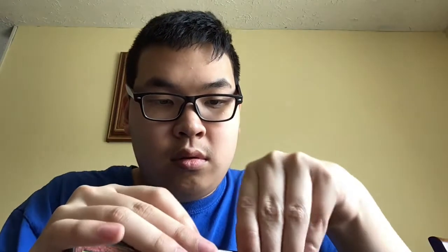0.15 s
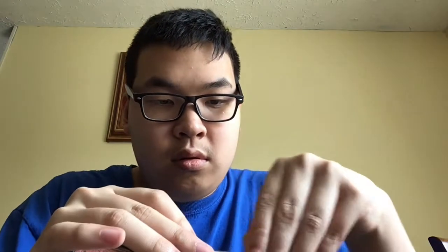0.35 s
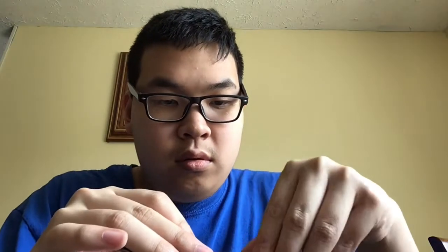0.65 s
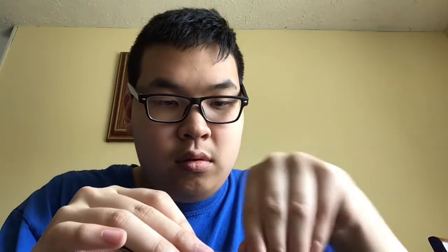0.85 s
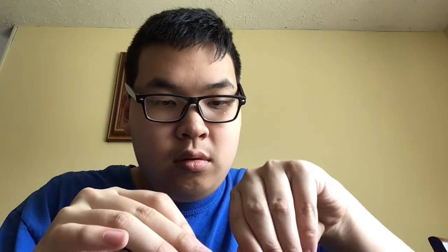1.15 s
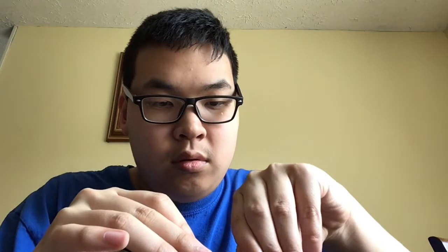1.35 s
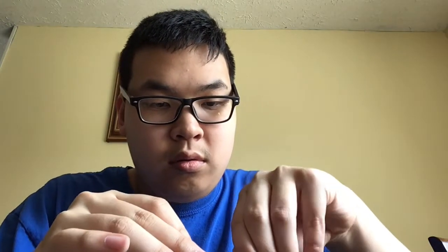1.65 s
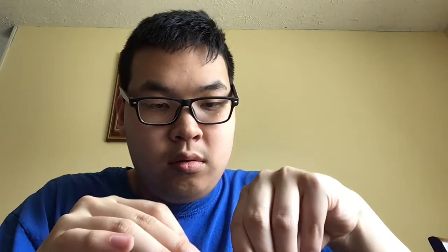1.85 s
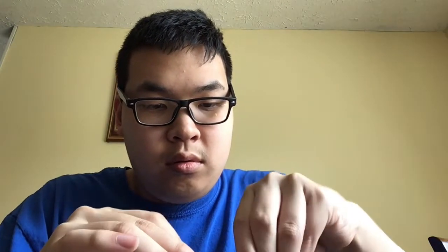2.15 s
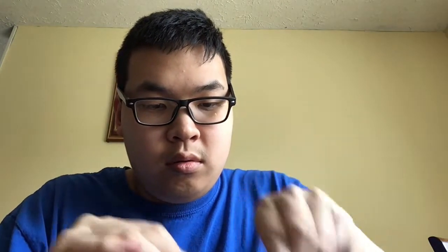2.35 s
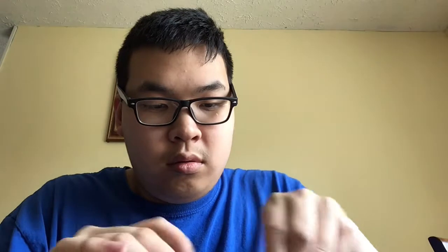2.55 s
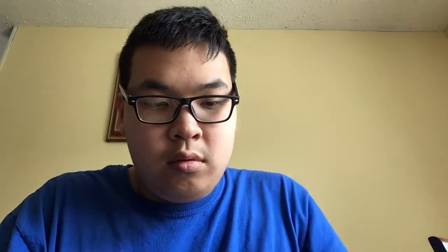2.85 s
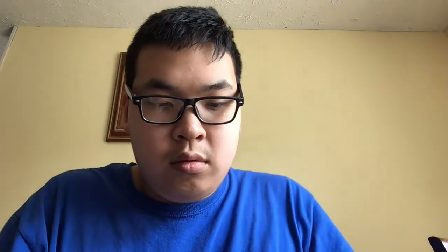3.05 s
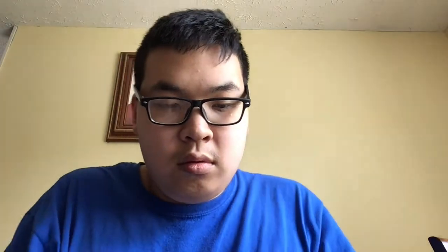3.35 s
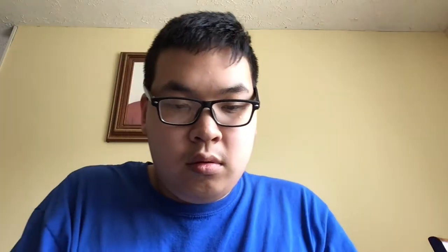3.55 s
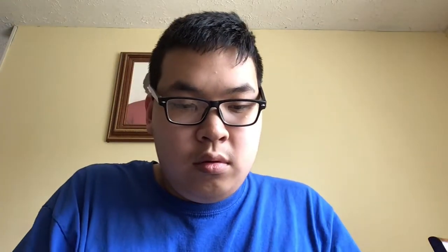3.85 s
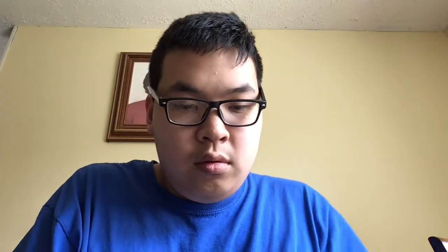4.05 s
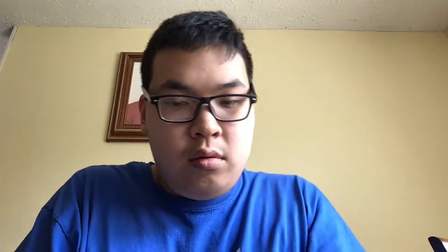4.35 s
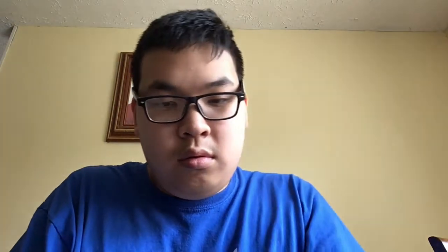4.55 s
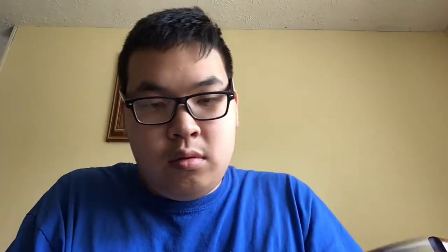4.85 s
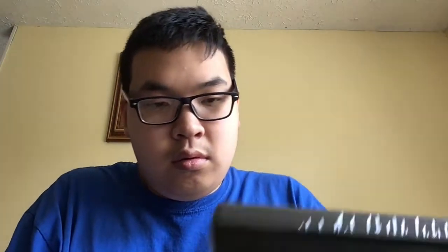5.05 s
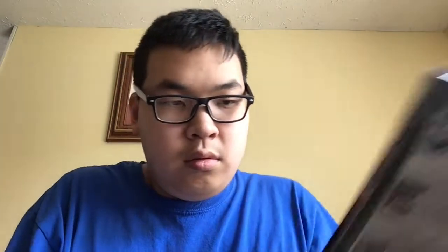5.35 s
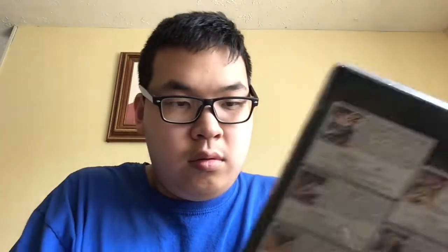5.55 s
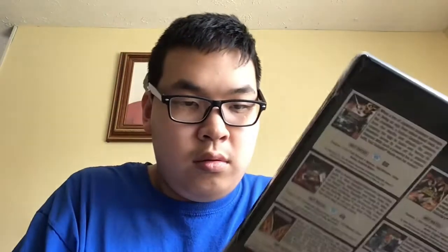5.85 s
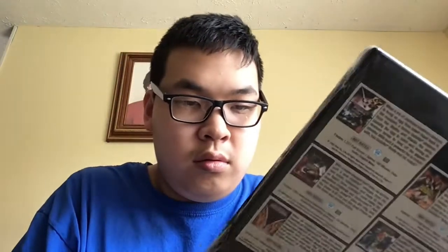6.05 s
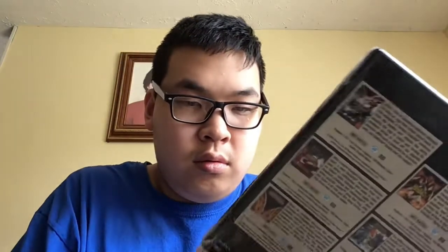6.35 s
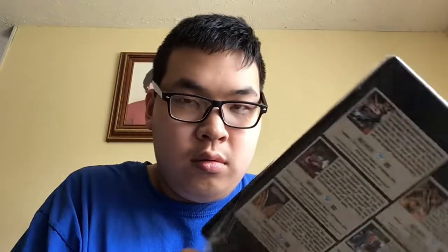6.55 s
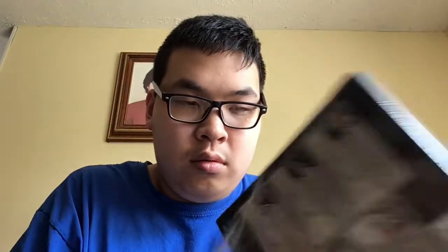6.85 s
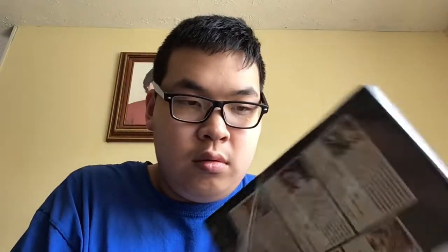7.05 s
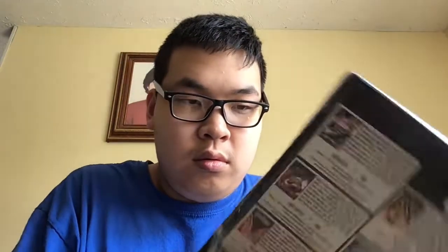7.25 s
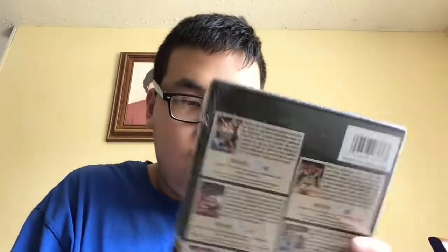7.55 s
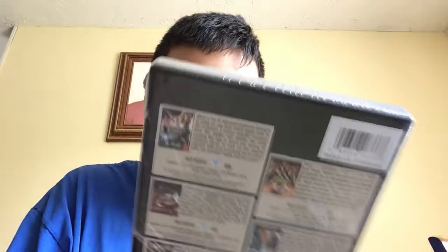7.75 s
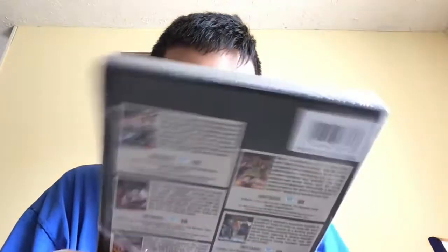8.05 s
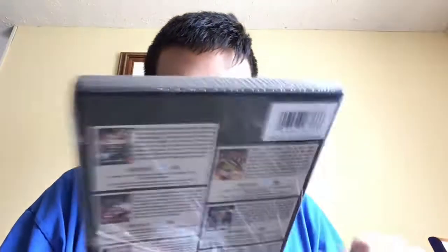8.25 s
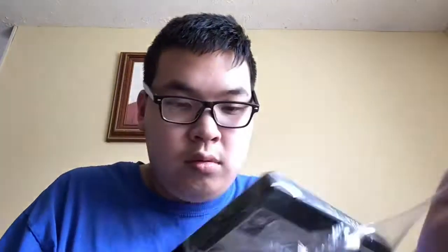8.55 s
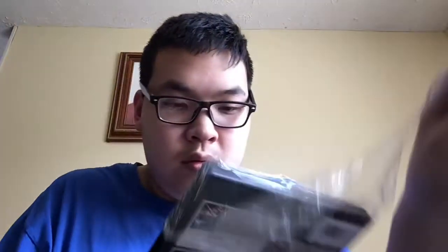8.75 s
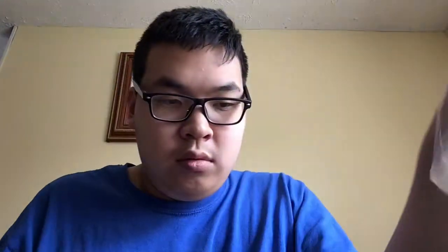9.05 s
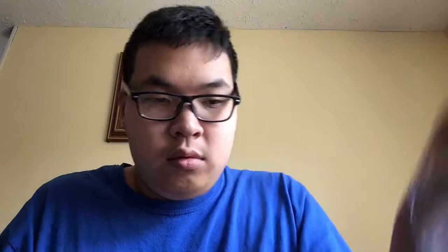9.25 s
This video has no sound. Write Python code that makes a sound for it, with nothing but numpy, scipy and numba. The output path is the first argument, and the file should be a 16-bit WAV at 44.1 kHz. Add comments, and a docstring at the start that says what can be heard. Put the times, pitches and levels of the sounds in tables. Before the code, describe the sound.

Close up in a small quiet room, shrink film snaps, rustles and tears from a plastic case while a faint engine passes outside.

```python
"""Close laptop microphone on a desk in a small room: shrink wrap is slit and pulled off a plastic case.
First come sharp snaps, a thump and light knocks; from 2.3 s tugs make the film rustle and tick, the hollow
case knock and the desk thump, with hard snaps near 5.2, 8.4 and 8.9 s. From 2.75 s a vehicle outside speeds
up through its gears, heard as wavering sines, with a lower one late on. Film, case and desk are dying rings
started by small events and echoed by the room; shaped noise gives the quiet air throughout."""
import sys
import numpy as np
from scipy import signal
from scipy.fft import rfft, irfft
from scipy.io import wavfile
from scipy.ndimage import uniform_filter1d
from numba import njit

SR = 44100
rng = np.random.default_rng(int(sys.argv[2]) if len(sys.argv) > 2 else 0)


def transcribe(signal):
    """Save signal, clipped to [-1, 1], as a 16-bit WAV file at the path in sys.argv[1]."""
    frames = np.atleast_2d(signal).T
    limited = np.clip(frames, -1, 1)
    pcm = np.round(limited * 32767).astype(np.int16)
    wavfile.write(sys.argv[1], SR, pcm)


N = 414099

# loud creases in the film: start_s, level_db (before the gain of each path), pitch_hz (centre)
SNAPS = [(0.1681, -38, 4250), (0.208, -30, 3400), (0.2819, -20, 5000), (2.342, -37.5, 6000),
         (2.716, -45.5, 2690), (2.805, -49, 3370), (2.859, -47, 3780), (3.152, -27, 2470),
         (3.1609, -24.5, 2320), (3.6794, -41, 2520), (3.81, -34, 2790), (4.3042, -35, 4530),
         (4.449, -42, 3030), (4.4657, -42.5, 2900), (4.532, -37.5, 3030), (4.659, -36.5, 2430),
         (5.021, -43, 3030), (5.2307, -9.5, 3800), (5.459, -51, 3750), (5.67, -46, 4600),
         (5.894, -47, 6500), (5.9197, -32.5, 7060), (5.974, -43.5, 5640), (6.1697, -46, 5370),
         (6.1893, -40, 3930), (6.2378, -40.5, 7100), (6.266, -44, 4600), (6.375, -46.5, 6200),
         (6.4082, -44, 8800), (6.427, -43.5, 6030), (6.453, -46.5, 6000), (6.492, -32, 4770),
         (6.571, -41.5, 3780), (6.732, -51, 4660), (6.9058, -39.5, 6640), (6.943, -42, 6290),
         (6.972, -46, 2620), (7.036, -43, 3050), (7.1243, -42, 5700), (7.3021, -33.5, 4840),
         (7.3932, -51, 4830), (7.753, -47.5, 5950), (7.9332, -41.5, 2900), (7.993, -46, 5000),
         (8.172, -22, 5000), (8.4408, -15.5, 5940), (8.4441, -15.5, 6300), (8.5552, -30.5, 5440),
         (8.741, -37, 7160), (8.796, -35.5, 3770), (8.895, -22, 8340), (8.9, -28, 4570), (8.941, -22, 4930),
         (8.944, -26, 4470), (9.366, -34, 4270)]
# tugs at the wrap: start_s, length_s, film_level_db, case_rub_level_db
TUGS = [ (2.322, 0.1, -62.5, -58.5), (2.524, 0.059, -66, -67), (2.804, 0.074, -69, -63),
        (3.038, 0.08, -67, -64.5), (3.153, 0.013, -48, -47), (3.618, 0.14, -70.5, -63),
        (3.792, 0.078, -64.5, -65.5), (3.945, 0.057, -66, -62.5), (4.039, 0.041, -69, -64.5),
        (4.272, 0.039, -56, -54.5), (4.362, 0.061, -62, -61.5), (4.442, 0.11, -62, -57),
        (4.636, 0.013, -60.5, -52.5), (4.717, 0.09, -66.5, -62.5), (4.848, 0.14, -72, -67),
        (4.984, 0.041, -61, -63.5), (5.154, 0.1, -66.5, -66), (5.308, 0.13, -63, -59.5),
        (5.646, 0.027, -59.5, -61), (5.772, 0.018, -58.5, -59), (5.868, 0.17, -62.5, -66),
        (5.915, 0.014, -52.5, -56), (6.098, 0.018, -62, -68.5), (6.234, 0.04, -59.5, -66),
        (6.377, 0.19, -64, -76), (6.55, 0.072, -63.5, -65), (6.687, 0.15, -65, -68.5),
        (6.865, 0.15, -67, -68), (7.055, 0.056, -64, -73), (7.227, 0.11, -59, -66.5),
        (7.375, 0.023, -61.5, -70), (7.431, 0.037, -55, -68), (7.516, 0.27, -69, -73.5),
        (7.847, 0.14, -61, -59.5), (8.089, 0.029, -57.5, -59.5), (8.17, 0.034, -52, -58),
        (8.32, 0.18, -65, -69.5), (8.547, 0.029, -47, -49.5), (8.674, 0.3, -61.5, -64.5),
        (8.853, 0.096, -54, -58), (9.155, 0.06, -60, -73.5), (9.273, 0.087, -65, -74.5),
        (9.378, 0.056, -51.5, -56)]
# colour of a crease: pitch_hz, relative level_db (per Hz)
FILM_COLOUR = [(710, -45), (1200, -20), (2970, 3.5), (3390, -16), (3820, -0.5), (7050, 0.5), (12700, -0.5),
               (15300, -57.5)]
# modes of the hollow case: pitch_hz, relative level_db, free ring time t60_s
CASE_MODES = [(506, 3.5, 0.016), (600, 0.5, 0.015), (729, -4, 0.044), (820, 1.5, 0.0079), (979, -6, 0.043),
              (1202, 3.5, 0.016), (1550, 9, 0.0063), (1850, 0.5, 0.01085)]
# knocks on the case: start_s, strength_db, pitch_hz where the case answers most
KNOCKS = [(0.2077, -36.5, 805), (0.594, -59, 775), (0.641, -63, 980), (0.781, -51, 780),
          (3.1492, -20.5, 710), (3.1615, -22.5, 621), (3.176, -31, 640), (3.6794, -48, 694),
          (3.812, -47, 622), (4.3033, -39.5, 683), (4.449, -47.5, 1270), (4.5324, -38.5, 766),
          (5.2303, -28.5, 1184), (6.1877, -48.5, 790), (6.569, -51.5, 1030), (6.9707, -51, 1220),
          (7.2444, -51, 880), (7.448, -44, 830), (7.9335, -47, 547), (8.1722, -38, 1020),
          (8.4442, -40.5, 700), (8.8939, -47, 740), (8.9406, -40, 640)]
# short scrapes along the case: start_s, length_ms, strength_db, pitch_hz where the case answers most
SCRAPES = [(3.96, 64, -45.5, 640), (4.645, 23.5, -47, 790), (6.755, 25, -60, 1260)]
# modes of the desk top: pitch_hz, relative level_db, free ring time t60_s
DESK_MODES = [(103, -4.5, 0.09), (145, 1, 0.082), (182.5, -3, 0.34), (236.3, 4, 0.1), (290.5, -3, 0.12),
              (339.6, 2.5, 0.064), (391, -3.5, 0.074)]
# blows that reach the desk: start_s, strength_db, contact_ms
THUMPS = [(0.038, -57, 1.25), (0.207, -35, 11.7), (2.382, -35.5, 2.8), (2.451, -37.5, 4.3),
          (2.557, -42.5, 1.9), (2.77, -55, 1.5), (3.157, -33.5, 0.29), (3.177, -41, 2.8),
          (3.823, -52.5, 0.68), (4.266, -30, 3), (4.298, -33, 3.6), (4.465, -35.5, 5.8), (4.526, -43, 2.6),
          (5.377, -48.5, 1.8), (6.576, -44, 8.2), (7.451, -47, 2.6), (8.44, -31.5, 0.74),
          (8.799, -48.5, 0.75), (8.852, -47, 2.4), (8.939, -44, 1)]
# level curve of forearms on the desk: time_s, level_db
SHUFFLE = [(0.0, -67), (1.46, -78.5), (1.78, -63.5), (2.27, -75.5), (2.51, -59.5), (3.61, -68.5),
           (4.29, -75.5), (4.44, -48), (4.73, -72), (7.9, -68), (8.45, -68), (8.73, -60), (9.07, -75),
           (9.39, -66.5)]
# echoes of the small room: pitch_hz, relative level_db, t60_s
ROOM = [(180, 1.5, 0.35), (830, -5.5, 0.39), (6000, -1.5, 0.28)]
# engine tones outside, one list per rising glide; the last is a lower tone: time_s, pitch_hz, level_db
ENGINE = [
    [(2.75, 124.2, -60), (3.02, 141, -64.5), (3.2, 152.5, -40)],
    [(3.6, 111, -69), (4.59, 141.1, -55.5), (5.05, 151.9, -57.5), (5.3, 139.8, -55.5)],
    [(5.77, 125.3, -66), (6.44, 137.2, -58.5), (7.45, 146.3, -64.5), (7.7, 162.5, -67)],
    [(6.9, 70.3, -89), (8.2, 87.2, -63.5), (9.39, 99.6, -72)],
]
# colour of the quiet air: pitch_hz, relative level_db (per Hz)
AIR_COLOUR = [(24, -40), (40, -8), (74, -4.5), (145, -3), (221, -33.5), (478, -36.5), (2920, -31),
              (15000, -47.5)]

RISE_DB_PER_S, FALL_DB_PER_S = 704, 358.5  # of a tug
FILM_REST_DB, CASE_REST_DB = -84, -79  # between tugs
TICK_HZ, TICK_DB, TICK_LINGER_S = 5900, -1, .12  # level against the rustle; ticks go on between tugs
RUB_HZ, RUB_DB_PER_OCTAVE = 770, -4.5
KNOCK_NARROW_DB, SCRAPE_NARROW_DB = 17.3, 80  # loss one octave off the pitch
LAND_SCATTER_DB = 2.5
DESK_FREE_UNTIL_S = 5  # after this the hands rest on the desk
FREE_SHARE, HELD_SHARE = 0.82, 0.28  # of the free ring time
ROOM_DB, FIRST_WALL_S = -10.5, .006
AIR_DB = -64.5
TOP_HZ = 15800


def snaps(gain_db):
    """Loud creases as heard from one direction; every direction hears the facets in another order."""
    start_s, level_db, pitch_hz = np.transpose(SNAPS)
    # a weaker crease is over sooner and takes fewer facet sizes
    reach = undb(0.15 * (level_db - level_db.max()))[:, None]
    dry = creases(start_s, level_db + gain_db, pitch_hz, 0.55 * reach, 1.8 * reach, cycles=14.1, count=60)
    return signal.sosfilt(signal.butter(2, 500, "high", fs=SR, output="sos"), dry)


def film(level_db):
    """A fine rustle of tiny creases and separate dry ticks, both uneven from one short clump to the next."""
    clump_db = 4.14 * np.clip(rng.standard_normal(N), -2, 1.5)

    start_s, size_db = swarm(rate=970, scatter_db=3.0)
    size_db = size_db + clump_db[(start_s * 45).astype(int)]  # 45 clumps a second
    pitch_hz = 5400 * 2 ** (0.455 * rng.standard_normal(len(start_s)))
    rustle = creases(start_s, size_db, pitch_hz, 0.37, 1.0, 39.0, count=5)

    start_s, size_db = swarm(rate=110, scatter_db=3.0)
    size_db = size_db + clump_db[(start_s * 20).astype(int)]  # 20 clumps a second
    pitch_hz = np.full(len(start_s), TICK_HZ)
    ticks = creases(start_s, size_db, pitch_hz, .5, .6, 17., count=12)

    linger_db = uniform_filter1d(level_db, int(TICK_LINGER_S * SR))
    return unit(rustle) * undb(level_db) + unit(ticks) * undb(linger_db + TICK_DB)


def creases(start_s, level_db, pitch_hz, burst_ms, octaves, cycles, count):
    """Each crease buckles facet after facet in a short burst; facets of all sizes ring a few cycles each.

    burst_ms is the mean delay of a facet, octaves the reach to either side of pitch_hz."""
    u = rng.random((len(start_s), count, 5))
    place = 2 * (np.arange(count) + u[..., 0]) / count - 1  # -1 lowest facet, 1 highest
    hz = np.clip(pitch_hz[:, None] * 2 ** (octaves * place), 600, 15500)
    colour = undb(on_log(hz, FILM_COLOUR) - 8.9 * place ** 2) * np.sqrt(hz / 5000)
    size = undb(level_db)[:, None] * colour / np.sqrt(np.sum(colour ** 2, axis=1, keepdims=True))
    late_s = -np.log(u[..., 1] * u[..., 3]) * burst_ms / 2000
    t60_s = cycles * (.5 + u[..., 2]) / hz
    return ring(start_s[:, None] + late_s, hz, t60_s, size * np.sign(u[..., 4] - .5))


def case(level_db):
    """Fingers rub the hollow case and now and then knock or scrape it; each contact rings its modes."""
    start_s, size_db = swarm(rate=800, scatter_db=5.0)
    tilt_db = RUB_DB_PER_OCTAVE * np.abs(np.log2(np.transpose(CASE_MODES)[0] / RUB_HZ))
    rub = unit(blows(start_s, size_db[:, None] + tilt_db, CASE_MODES, 2.5, 0.11)) * undb(level_db)

    start_s, strength_db, pitch_hz = np.transpose(KNOCKS)
    spread_ms = np.full(len(start_s), 1.8)
    knocks = contacts(start_s, strength_db, pitch_hz, spread_ms, KNOCK_NARROW_DB, count=3)

    start_s, length_ms, strength_db, pitch_hz = np.transpose(SCRAPES)
    scrapes = contacts(start_s, strength_db, pitch_hz, length_ms / 2, SCRAPE_NARROW_DB, count=24)
    return rub + knocks + scrapes


def contacts(start_s, strength_db, pitch_hz, spread_ms, narrow_db, count):
    """A run of uneven contacts on the case; modes far from the place of contact answer less."""
    start_s, strength_db = bounces(start_s, strength_db, spread_ms, count=count)
    octaves_off = np.log2(np.transpose(CASE_MODES)[0] / np.repeat(pitch_hz, count)[:, None])
    mode_db = strength_db[:, None] - narrow_db * octaves_off ** 2
    return blows(start_s, mode_db, CASE_MODES, 2.76, 0.08, share=0.69)


def desk(level_db):
    """Forearms shuffle and blows land on the desk top; a softer blow leaves the high modes out."""
    start_s, size_db = swarm(rate=350, scatter_db=0.0)
    shuffle = unit(blows(start_s, size_db[:, None], DESK_MODES, 7.85, 0.034)) * undb(level_db)

    start_s, strength_db, contact_ms = np.transpose(THUMPS)
    start_s, strength_db = bounces(start_s, strength_db, np.full(len(start_s), 6.), count=3)
    modes = DESK_MODES + CASE_MODES  # the case sounds along with the desk
    hz = np.transpose(modes)[0]
    contact_s = np.repeat(contact_ms, 3)[:, None] / 1000
    soft_db = -20 * np.log10(1 + (hz * contact_s) ** 2)
    share = np.where(start_s < DESK_FREE_UNTIL_S, FREE_SHARE, HELD_SHARE)[:, None]
    thumps = blows(start_s, strength_db[:, None] + soft_db, modes, LAND_SCATTER_DB, 0.0052, share)
    return shuffle + thumps


def bounces(start_s, strength_db, spread_ms, count):
    """Turns each blow into a first contact and a few weaker, uneven ones after it, spread_ms later on average."""
    u = rng.random((len(start_s), count))
    u[:, 0] = 0
    late_s = 2 * u * np.abs(spread_ms)[:, None] / 1000
    return (start_s[:, None] + late_s).ravel(), (strength_db[:, None] - 2.4 * u).ravel()


def blows(start_s, strength_db, modes, scatter_db, drift, share=1):
    """Each blow lands elsewhere, so the modes take it with new strengths, signs and slightly new pitches."""
    hz, mode_db, t60_s = np.transpose(modes)
    g = rng.standard_normal((len(start_s), len(hz), 3))
    size = undb(strength_db + mode_db + scatter_db * g[..., 0]) * np.sign(g[..., 1])
    return ring(start_s[:, None], hz * (1 + drift * g[..., 2]), t60_s * share, size)


def effort():
    """Every tug swells, holds and dies away by one rule; film and case add their power over a resting level."""
    time = np.arange(0, N, 64) / SR
    start_s, length_s, film_db, case_db = np.transpose(TUGS)[..., None]
    before_s = np.maximum(start_s - time, 0)
    after_s = np.maximum(time - start_s - length_s, 0)
    shape_db = -RISE_DB_PER_S * before_s - FALL_DB_PER_S * after_s
    levels = []
    for tug_db, rest_db in ((film_db, FILM_REST_DB), (case_db, CASE_REST_DB)):
        power = undb(2 * rest_db) + np.sum(undb(2 * (tug_db + shape_db)), axis=0)
        levels.append(np.interp(np.arange(N) / SR, time, 10 * np.log10(power)))
    return levels


def room(x):
    """The walls return the handling, and each of four walls its own view of the snaps."""
    return x + echoes(x) + sum(echoes(snaps(gain_db=-0.5)) for _ in range(4))


def echoes(x):
    """Diffuse echoes that set in after the first wall: octave bands of noise, each with its own decay."""
    room_hz, *columns = np.transpose(ROOM)
    time, tail = np.arange(SR // 2) / SR, 0
    for hz in 90 * 2 ** np.arange(8):
        level_db, t60_s = (np.interp(np.log(hz), np.log(room_hz), c) for c in columns)
        sos = signal.butter(2, [hz / np.sqrt(2), hz * np.sqrt(2)], "band", fs=SR, output="sos")
        band = signal.sosfilt(sos, rng.standard_normal(len(time)))
        tail = tail + band * undb(level_db - 60 * time / t60_s)
    tail = tail * np.clip(time / FIRST_WALL_S - .5, 0, 1) ** 2
    return undb(ROOM_DB) * signal.fftconvolve(x, tail / np.sqrt(np.sum(tail ** 2)))[:N]


def engine():
    """Low engine tones pass the walls; each glide fades in and out and wavers a little."""
    out, time = 0, np.arange(N) / SR
    for glide in ENGINE:
        time_s, pitch_hz, level_db = np.transpose(glide)
        fade = np.clip(np.minimum(time - time_s[0], time_s[-1] - time) / 0.038, 0, 1)
        waver = uniform_filter1d(rng.standard_normal(N), int(SR / 12)) * np.sqrt(SR / 12)
        phase = 2 * np.pi * np.cumsum(np.interp(time, time_s, pitch_hz)) / SR + 0.97 * waver
        level = np.sqrt(2) * undb(np.interp(time, time_s, level_db))
        out = out + fade * level * np.sin(phase)
    return out


def air():
    """Steady hush of the room and the microphone: noise with a shaped spectrum."""
    hz = np.fft.rfftfreq(N, 1 / SR)
    spectrum = rfft(rng.standard_normal(N)) * undb(on_log(hz, AIR_COLOUR))
    return unit(irfft(spectrum, N)) * undb(AIR_DB)


def swarm(rate, scatter_db):
    """Random moments (rate per second) with sizes in dB: many faint, a few loud, none huge."""
    count = int(rate * N / SR)
    return rng.random(count) * N / SR, scatter_db * np.minimum(rng.exponential(size=count), 4.0)


def ring(start_s, hz, t60_s, size):
    """Exponentially dying sines; all arguments broadcast."""
    start_s, hz, t60_s, size = (a.ravel() for a in np.broadcast_arrays(start_s, hz, t60_s, size + 0j))
    turn = 2j * np.pi * np.clip(hz, 20, SR / 2.2) / SR
    pole = np.exp(turn - np.log(1000) / (t60_s * SR))
    return grains(N, np.clip(start_s * SR, 0, N - 1).astype(np.int64), pole, size)


@njit
def grains(n, start, pole, size):
    """Adds a dying ring for every (start sample, pole, size), down to 1/500 of its size."""
    y = np.zeros(n)
    for k in range(len(start)):
        z, i, end = size[k], start[k], abs(size[k]) / 500
        while i < n and abs(z) > end:
            y[i] += z.imag
            z *= pole[k]
            i += 1
    return y


def curve(table):
    """The columns of a (time_s, value, ..) table, one value a sample."""
    time_s, *columns = np.transpose(table)
    return [np.interp(np.arange(N) / SR, time_s, c) for c in columns]


def on_log(hz, table):
    """Reads (pitch_hz, value) rows on a log-frequency axis."""
    f, v = np.transpose(table)
    return np.interp(np.log(np.maximum(hz, 1)), np.log(f), v)


def undb(db):
    """Decibels to amplitude."""
    return 10 ** (np.asarray(db) / 20)


def unit(x):
    """Scales to an rms of one."""
    return x / np.sqrt(np.mean(x ** 2))


def scene():
    """Snaps straight to the microphone, handling with its echoes, the vehicle outside and the air."""
    film_db, case_db = effort()
    handling = film(film_db) + case(case_db) + desk(*curve(SHUFFLE))
    return (snaps(gain_db=6.5) + room(handling) + engine() + air())[None]


def record(dry):
    """The microphone drops the deepest bass and the top is cut."""
    low_cut = signal.butter(4, 48, "high", fs=SR, output="sos")
    top_cut = signal.ellip(8, .2, 70, TOP_HZ, fs=SR, output="sos")
    return signal.sosfilt(top_cut, signal.sosfilt(low_cut, dry))


dry = scene()
out = record(dry)
transcribe(out)
```